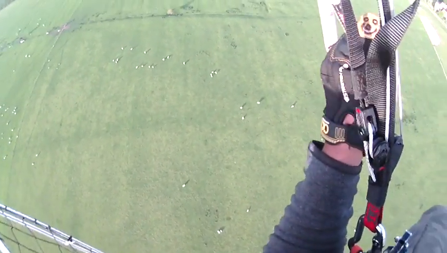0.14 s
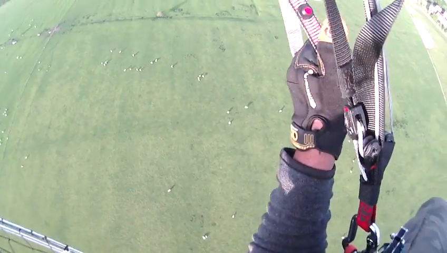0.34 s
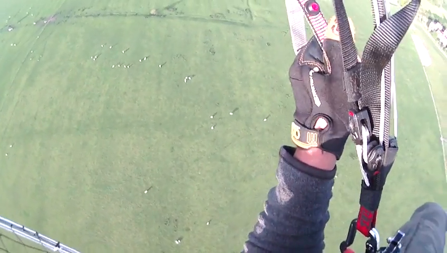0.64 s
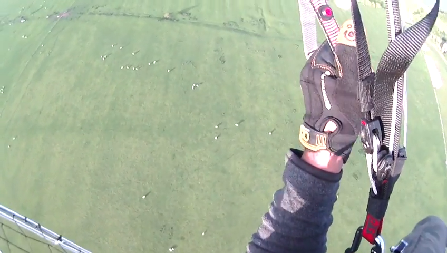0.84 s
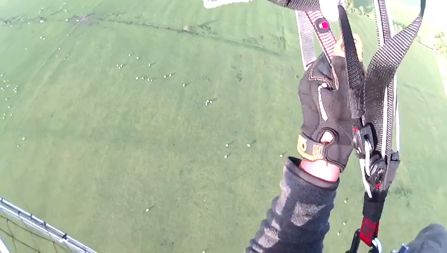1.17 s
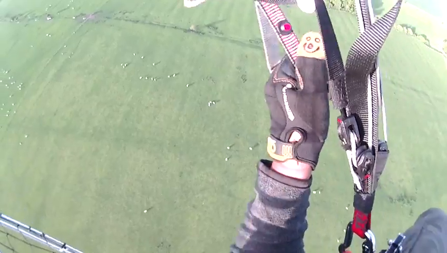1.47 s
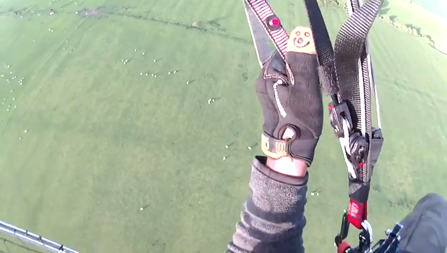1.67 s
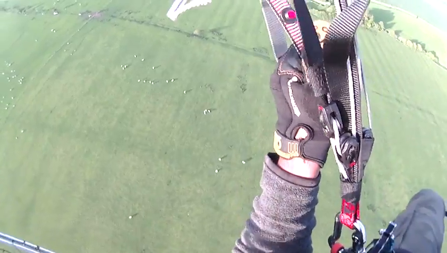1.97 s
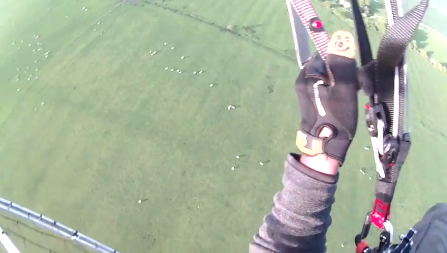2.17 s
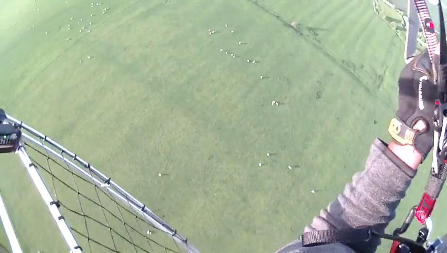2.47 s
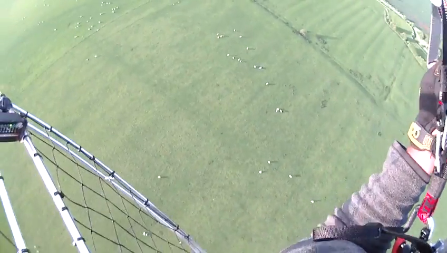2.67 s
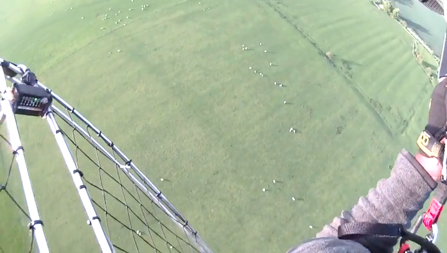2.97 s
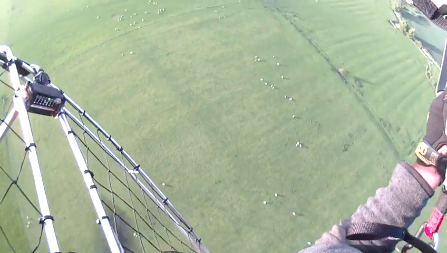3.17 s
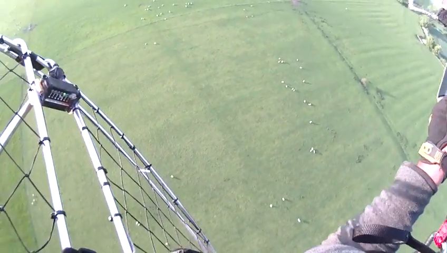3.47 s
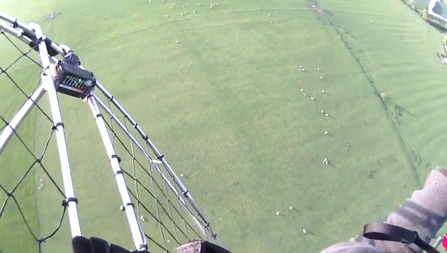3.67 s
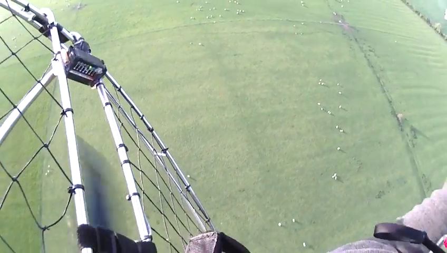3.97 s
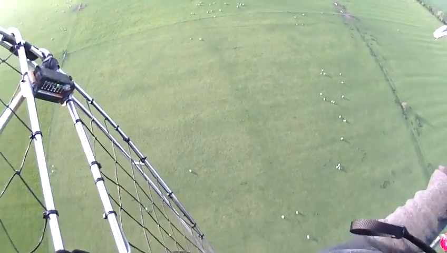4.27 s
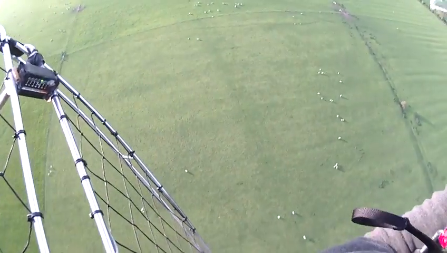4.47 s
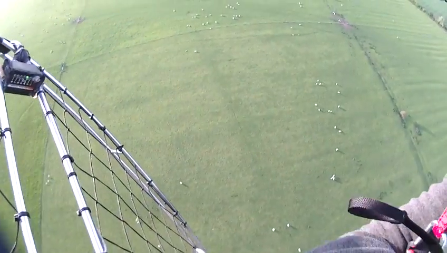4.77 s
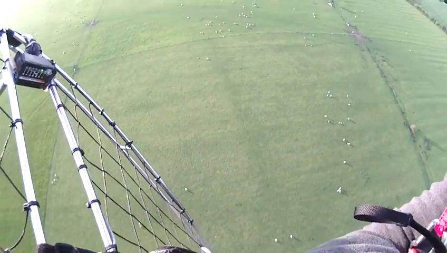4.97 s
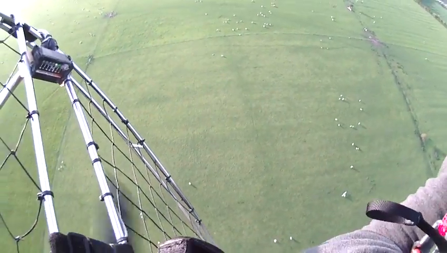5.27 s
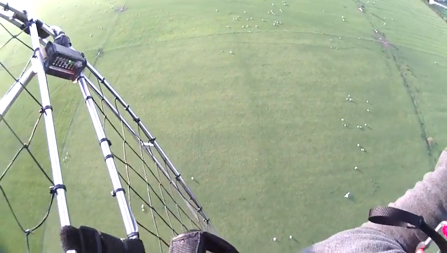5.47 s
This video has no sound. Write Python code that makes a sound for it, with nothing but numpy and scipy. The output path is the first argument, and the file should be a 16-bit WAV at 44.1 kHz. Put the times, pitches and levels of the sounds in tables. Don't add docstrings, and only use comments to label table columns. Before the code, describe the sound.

High over open fields, a two-stroke motor sputters continuously, firing irregularly among weak misfires. Dry mid-pitched pops ring the silencer and cooling fins, making a nearly constant nasal whine. Piston chatter, fast pulsing hiss and a faint high whistle fill the gaps. Lumpy wind is clear at first and nearly gone after three seconds, when the engine becomes more direct. The microphone is close, in a sealed case, with little bass and crunchy overloaded peaks.

```python
import sys
import numpy as np
from scipy import signal
from scipy.io import wavfile
from scipy.ndimage import uniform_filter1d

SR = 44100
rng = np.random.default_rng(int(sys.argv[2]) if len(sys.argv) > 2 else 0)


def attenuation_scalar(level_db):
    decades = np.asarray(level_db, float) / 20
    return 10 ** decades


def dump(signal):
    limited = np.clip(np.atleast_2d(signal).T, -1, 1)
    pcm = np.round(limited * 32767).astype(np.int16)
    wavfile.write(sys.argv[1], SR, pcm)


N = 247842
TURNS_PER_S = 47.5

# start_s [s], facing [0-1]
HEAD_TURN = [
    (0.0, 0.16),
    (1.4, 0),
    (2.3, 0),
    (2.95, 0.06),
    (3.25, 0.83),
    (4.0, 0.93),
    (4.95, 0.6),
    (5.62, 0.66),
]
# pitch_hz [Hz], level_db [dB], t60_s [s], rise_ms [ms], change_per_blow_db [dB]
SILENCER_MODES = [(1526, -7.5, 0.027, 1, 0.96), (1562, -2, 0.014, 0.98, 0.41), (1605, -4.5, 0.032, 1, 0.23)]


def rms_one(x):
    return x / np.sqrt(np.mean(x ** 2) + 1e-20)


def filtered(x, order, hz, kind):
    return signal.sosfilt(signal.butter(order, hz, kind, fs=SR, output="sos"), x)


def in_time(rows):
    s, *columns = np.transpose(rows)
    return [np.interp(np.arange(N) / SR, s, column) for column in columns]


def drift(rate):
    r = np.exp(-80 * np.pi * rate / SR)
    noise = rng.standard_normal(N // 40 + 2002)
    slow = signal.lfilter([1], [1, -2 * r, r * r], noise)[2000:]
    return np.interp(np.arange(N) / 40, np.arange(len(slow)), rms_one(slow))


def narrow_noise(hz, width_hz):
    r = np.exp(-np.pi * width_hz / SR)
    poles = [1, -2 * r * np.cos(2 * np.pi * hz / SR), r * r]
    once = signal.lfilter([1, 0, -1], poles, rng.standard_normal(N))
    return rms_one(signal.lfilter([1, 0, -1], poles, once))


def banded_noise(spectrum, patchy_db, speed):
    hz, db = np.transpose(spectrum)
    edges = np.geomspace(hz[0], hz[-1], int(3 * np.log2(hz[-1] / hz[0])) + 2)
    white = rng.standard_normal((2, N))
    together = drift(speed)
    out = np.zeros(N)
    for k, (low, high) in enumerate(zip(edges, edges[1:])):
        band = filtered(white[k % 2], 2, [low, high], "band")
        level_db = np.interp(np.log(low * high) / 2, np.log(hz), db)
        flicker_db = patchy_db * (0.26 * together + drift(speed))
        out += attenuation_scalar(level_db + flicker_db) * band
    return rms_one(out)


def struck(seconds, blow_db, modes):
    out = np.zeros(N)
    at = np.clip(np.round(seconds * SR).astype(int), 0, N - 1)
    chance = rng.standard_normal((len(at), len(modes)))
    for k, (hz, level_db, t60, rise_ms, change_db) in enumerate(modes):
        t = np.arange(int(t60 * SR)) / SR
        rise = 1 - np.exp(-(1000 * t / rise_ms) ** 2)
        ring = rise * attenuation_scalar(-60 * t / t60) * np.sin(2 * np.pi * hz * t)
        clicks = np.bincount(at, attenuation_scalar(blow_db + level_db + change_db * chance[:, k]), N)
        out += signal.oaconvolve(clicks, ring)[:N]
    return out


def turns():
    # start_s [s], fin_ring_db [dB], port_opens_after_ms [ms], exhaust_db
    # [dB]
    main_firings = [(-0.008, -13.5, 8.3, -0.5), (0.1147, -6.5, 7.7, -4), (0.3794, -6, 7.5, -3),
                    (0.655, -11.5, 7.1, -2.5), (0.7403, -7.5, 7.8, -3.5), (0.8905, -5.5, 9, -1.5),
                    (1.0199, -6, 9.6, -1), (1.2482, -6.5, 7.4, -0.5), (1.6298, -5, 9.3, -1),
                    (1.7173, -6.5, 7.8, -4), (1.8488, -6.5, 8.6, -4.5), (2.0269, -6, 6.8, -0.5),
                    (2.1551, -4.5, 8.1, -2), (2.5699, -5.5, 8.4, 2), (2.9283, -2, 6.9, -1),
                    (3.0329, -6.5, 11, -2), (3.1177, -5.5, 10.2, -3), (3.2456, -8.5, 10, 3),
                    (3.4721, -10.5, 8.7, -1.5), (3.6991, -3.5, 9.6, -2), (3.9206, -8, 9.6, 2.5),
                    (4.0408, -16, 8.7, -0.5), (4.4549, -15.5, 7.8, -3), (4.6599, -3.5, 6.5, -4),
                    (4.7407, -7, 8.1, -0.5), (4.8844, -7, 7.3, -1), (5.0291, -3.5, 7.3, -1),
                    (5.1119, -4, 7.5, -3), (5.1525, -11.5, 8.3, -1.5), (5.609, -4, 6.9, 0),
                    (0.0734, -8, 7.5, -4), (0.216, -12, 8.9, -2), (0.2964, -3, 7.6, -8),
                       (0.4838, -9, 7.5, -9), (0.5906, -7.5, 8.0, -5.5), (0.8035, -8.5, 9.5, -6),
                       (0.8481, -9, 8.3, -18), (1.1337, -16, 8.5, -7), (1.3575, -11, 10.2, -7),
                       (1.5645, -11.5, 8.9, -8.5), (1.7842, -6.5, 6.8, -7.5), (1.9595, -7.5, 8.6, -6.5),
                       (2.1142, -8.5, 6.8, -7), (2.3326, -9, 9.6, -12), (2.4839, -6.5, 8.1, -5.5),
                       (2.7155, -5.5, 8.8, -7.5), (2.8009, -5.5, 8.5, -4), (2.8645, -5, 8.1, -4.5),
                       (3.075, -10.5, 11.2, -5), (3.3693, -12.5, 7.8, -9), (3.578, -6.5, 7.2, -5),
                       (3.8198, -8, 7.9, -5), (4.1225, -6.5, 7.3, -5), (4.3316, -12, 8.3, -9),
                       (4.5784, -7, 6.6, -4.5), (5.2551, -8, 7.9, -6), (5.2972, -8, 7.6, -4),
                       (5.3594, -4, 8.9, -3), (5.4227, -8.5, 8.0, -4), (5.4857, -8, 7.3, -5.5)]
    # start_s [s], fin_ring_db [dB], exhaust_db [dB]
    lean_firings = [(0.1555, -9, -10), (0.1754, -8.5, -15), (0.5475, -16, -10), (0.6329, -6.5, -13),
                    (0.934, -8.5, -13), (1.5, -15, -9), (1.6735, -10.5, -16), (1.8925, -11, -11),
                    (2.221, -12.5, -10.5), (2.3973, -12.5, -5.5), (2.5272, -8.5, -6), (2.6733, -9.5, -7.5),
                    (2.758, -8, -8), (2.9904, -8.5, -8.5), (3.1614, -7.5, -16), (3.639, -8.5, -8.5),
                    (4.002, -9, -11.5), (4.2057, -7, -13), (4.2264, -22, -10), (4.2478, -15.5, -11),
                    (4.269, -10.5, -9.5), (4.3721, -11, -8.5), (4.4139, -11.5, -7), (4.5358, -8, -10),
                    (4.7814, -6, -29), (4.988, -10, -6.5), (5.2334, -8, -19), (5.526, -9.5, -16),
                    (5.5477, -11.5, -10.5)]
    # fin ring dB, port opens after ms, pop dB, silencer ring dB
    misfire = np.array([-16, 8.3, -22.5, -15])
    misfire_spread = np.array([2.0, 0.5, 2.5, 3.0])
    catch_gain = np.array([4.1, 0.34, 2.75, 3.2])
    catch_fades = 0.92

    lean = [(start, fin, misfire[1], exhaust) for start, fin, exhaust in lean_firings]
    s, fin_db, port_ms, exhaust_db = np.transpose(sorted(main_firings + lean))
    turns_between = np.maximum(1, np.round(np.diff(s) * TURNS_PER_S))
    fired = np.r_[0, np.cumsum(turns_between)].astype(int)

    every = np.arange(fired[-1] + 1)
    since = every - fired[np.searchsorted(fired, every, "right") - 1]
    caught = (since % 2 == 0) * catch_fades ** (since / 2 - 1)
    scatter = misfire_spread * rng.standard_normal((len(every), 4))
    weak = misfire + np.outer(caught, catch_gain) + scatter
    rows = np.c_[np.interp(every, fired, s), weak]

    facing = np.interp(s, *np.transpose(HEAD_TURN))
    pop_db = exhaust_db - 4.5 + 3.0 * facing
    rows[fired] = np.c_[s, fin_db, port_ms, pop_db, exhaust_db]
    return rows.T


def crank(s):
    steady = np.arange(len(s)) / TURNS_PER_S
    scatter = uniform_filter1d(s - steady, size=7, mode="nearest")
    even = steady + uniform_filter1d(scatter, size=7, mode="nearest")
    beyond = np.r_[even[0] - 1, even, even[-1] + 1] * SR
    count = np.r_[-TURNS_PER_S, np.arange(len(s)), len(s) - 1 + TURNS_PER_S]
    return np.interp(np.arange(N), beyond, count)


def fins(s, fin_db):
    # pitch_hz [Hz], level_db [dB], t60_s [s], rise_ms [ms], change_per_blow_db [dB]
    fin_modes = [(1950, -.5, 0.12, 3.26, .5), (1950, -14, 0.14, 4.2, 3), (1935, -18, 0.11, 1.5, 4),
                 (2096, -27, 0.064, 1.3, 5)]
    share = np.interp(np.arange(N) / SR, s, np.arange(len(s))) % 1
    damping_db = -6.5 * np.exp(-((share - 0.8) / 0.13) ** 2)
    return struck(s - 0.002, fin_db, fin_modes) * attenuation_scalar(damping_db)


def combustion(s, fin_db, port_ms, pop_db, silencer_db):
    # pitch_hz [Hz], level_db [dB], t60_s [s], rise_ms [ms], change_per_blow_db [dB]
    pop_modes = [(562.5, 2, 0.015, 0.05, 1.8), (713, -2, 0.022, 1, 1.4), (439, -1.5, 0.021, 1, 1.16),
                 (1008, -10, 0.011, 1, 9)]
    port = s + port_ms / 1000 - 0.0004
    pop = filtered(struck(port, pop_db, pop_modes), 4, 221.4, "high")
    arrival = struck(port + 0.00118, silencer_db, SILENCER_MODES)
    echo = struck(port + 0.004645, silencer_db - 8.0, SILENCER_MODES)
    return fins(s, fin_db) + pop + arrival + echo


def pumping(turn):
    # multiple_of_turn_rate [ratio], level_db [dB]
    engine_orders = [(4, -26), (5, -11), (6, -5), (7, -.5), (8, -5), (9, -4), (10, -3), (11, -5), (12, -6),
                     (13, -6), (14, -8), (15, -5), (16, -9)]
    out = np.zeros(N)
    for order, level_db in engine_orders:
        tone = np.sin(2 * np.pi * (order * turn + rng.random()))
        out += attenuation_scalar(level_db + 2.5 * drift(7.0)) * tone
    return attenuation_scalar(-28.5) * rms_one(out)


def gas(s, turn, fin_db, rush_db, hiss_db):
    # pitch_hz [Hz], width_hz [Hz], level_db [dB]
    pipe_resonances = [(412, 410, -38.5), (732, 65, -38), (1057, 340, -34), (1584, 165, -27.5),
                       (2133, 160, -41)]
    # pitch_hz [Hz], level_db [dB per Hz]
    hiss_spectrum = [(1290, -13), (2200, -17), (2510, -25), (2780, -18.5), (3360, -12), (3710, -11),
                     (5960, -16.5), (6690, -15), (8870, -27.5), (10100, -27.5), (11200, -19),
                     (14800, -17.5), (16000, -29)]
    heat_db = np.interp(np.arange(N) / SR, s + 0.0087, fin_db - fin_db.mean())

    rush = np.zeros(N)
    for hz, width_hz, level_db in pipe_resonances:
        rush += attenuation_scalar(level_db + 1.7 * drift(31.0)) * narrow_noise(hz, width_hz)
    rush *= attenuation_scalar(rush_db + 0.25 * heat_db + 1.3 * np.cos(2 * np.pi * turn - 2.5))

    sawtooth = uniform_filter1d((turn + 0.14) % 1 - 0.5, size=130)
    beat_db = 0.45 * heat_db - 7.5 * sawtooth
    hiss = banded_noise(hiss_spectrum, patchy_db=1.0, speed=28.0)
    return rush + attenuation_scalar(hiss_db + 6.5 + beat_db) * hiss


def rattle(s, turn, rattle_db):
    casing_hz = [2859, 2993, 3257, 3397, 3445, 3533, 2300, 5233, 6584]
    # level_db [dB], t60_s [s]
    casing_rings = [(-2, 0.11), (-3.5, 0.081), (3.5, 0.066), (-7.5, 0.3), (-9.5, 0.055), (-38, 0.054),
                    (-11, 0.037), (-10.5, 0.071), (-5.5, 0.026)]
    modes = [(hz, db, t60, 0.3, 4.0) for hz, (db, t60) in zip(casing_hz, casing_rings)]
    slaps = np.r_[s - 0.002, s + 0.0045, s + 0.013]
    slaps = slaps + rng.normal(0, 0.0005, len(slaps))

    chatter = rms_one(filtered(rng.standard_normal(N), 4, [2750, 3650], "band"))
    chatter *= attenuation_scalar(-7.0 + 3.5 * np.cos(2 * np.pi * (3 * turn + 0.3)))
    casing = attenuation_scalar(rattle_db + 1.0) * (rms_one(struck(slaps, 0, modes)) + chatter)

    waves = np.r_[s - 0.003, s + 0.0145]
    waves_db = -23 + 2.2 * rng.standard_normal(len(waves))
    return casing + struck(waves, waves_db, SILENCER_MODES)


def wind(whistle_db):
    # pitch_hz [Hz], level_db [dB per Hz]
    buffet_spectrum = [(40, -49), (100, -33), (160, -18.5), (230, -10.5), (320, 3), (410, -1.5),
                       (520, -14.5), (750, -14), (1000, -22)]
    # start_s [s], level_db [dB]
    gust_levels = [(0.0, -24.5), (0.28, -26), (0.54, -17), (1.02, -20.5), (1.3, -17.5), (1.55, -25),
                   (1.7, -20), (1.88, -24.5), (1.98, -18.5), (2.35, -29), (2.7, -27), (3.2, -40.5),
                   (4.1, -44), (5.62, -49)]
    gust_db, = in_time(gust_levels)
    buffet = attenuation_scalar(gust_db - 0.5) * banded_noise(buffet_spectrum, patchy_db=0.5, speed=6.0)
    rumble = attenuation_scalar(-78) * rms_one(filtered(rng.standard_normal(N), 2, 110, "low"))
    whistle = attenuation_scalar(whistle_db - 14.0) * narrow_noise(10850, 160)
    return buffet + rumble + whistle


def scene():
    facing, = in_time(HEAD_TURN)
    s, fin_db, port_ms, pop_db, silencer_db = turns()
    turn = crank(s)
    firings = combustion(s, fin_db, port_ms, pop_db, silencer_db)

    drone = pumping(turn)
    drone += gas(s, turn, fin_db, rush_db=0.65 + 2 * facing, hiss_db=-53 + 2 * facing)
    drone += rattle(s, turn, rattle_db=-46.5 + 4 * facing)
    drone = filtered(drone, 6, 216.5, "high")

    whistle_db = -52.5 - 5 * facing + 9.3 * np.cos(2 * np.pi * turn - 1.5)
    return (firings + drone + wind(whistle_db))[None]


def roll_off(x):
    return signal.sosfilt(signal.butter(12, 16140, fs=SR, output="sos"), x)


def record(dry):
    overload = 0.71
    top_cut = signal.ellip(12, 0.5, 70, 15800, fs=SR, output="sos")
    clipped = np.clip(signal.sosfilt(top_cut, dry), -overload, overload)
    return roll_off(clipped)


dry = scene()
out = record(dry)
dump(out)
```